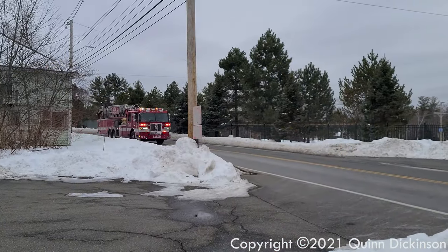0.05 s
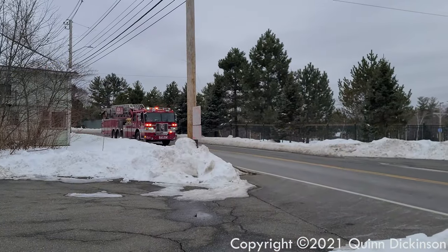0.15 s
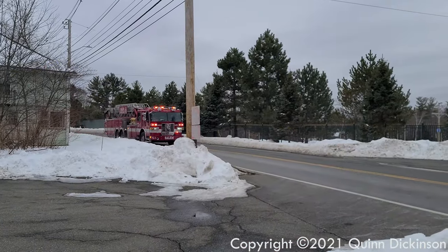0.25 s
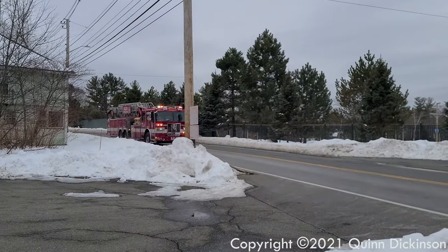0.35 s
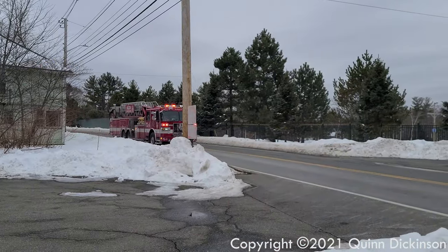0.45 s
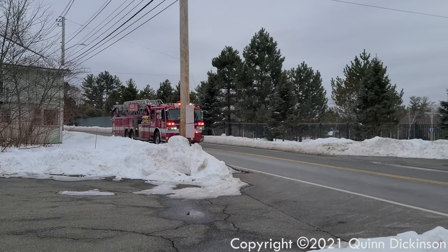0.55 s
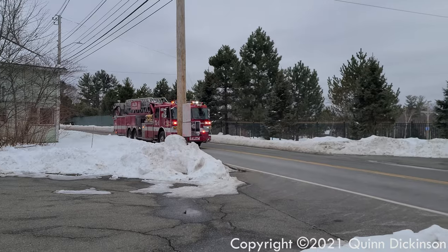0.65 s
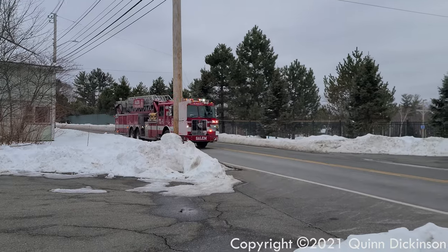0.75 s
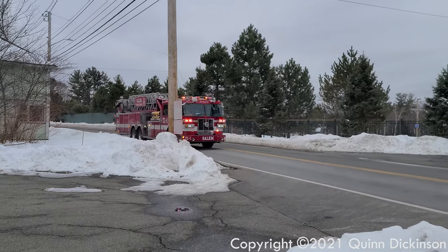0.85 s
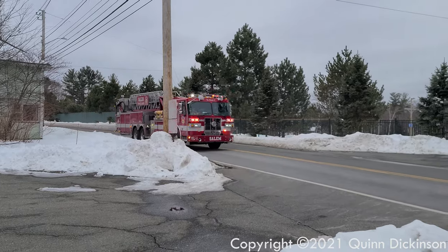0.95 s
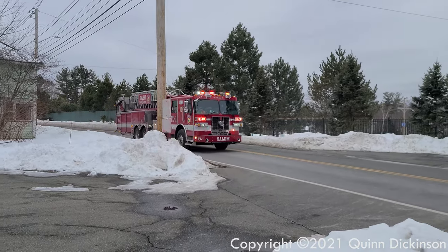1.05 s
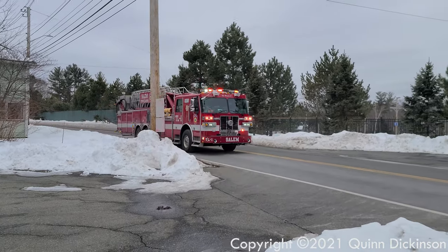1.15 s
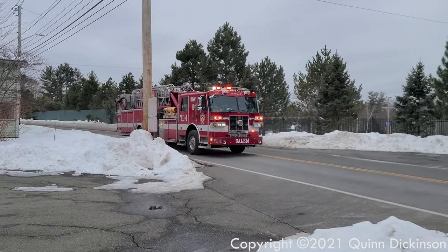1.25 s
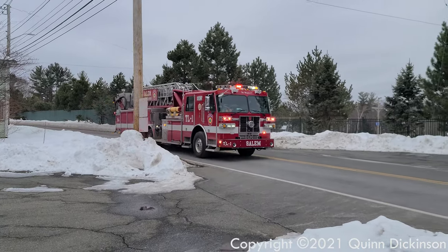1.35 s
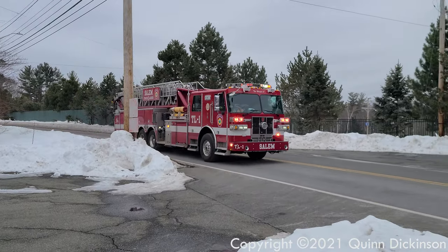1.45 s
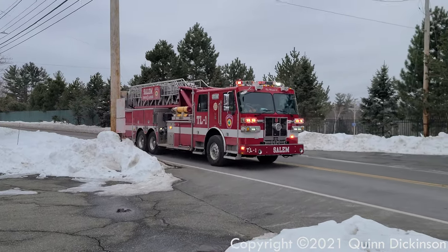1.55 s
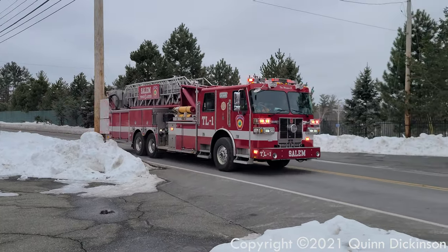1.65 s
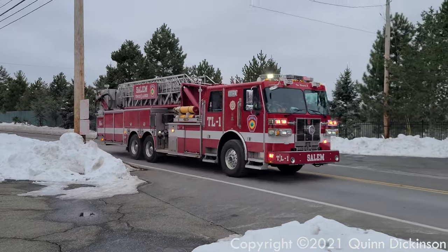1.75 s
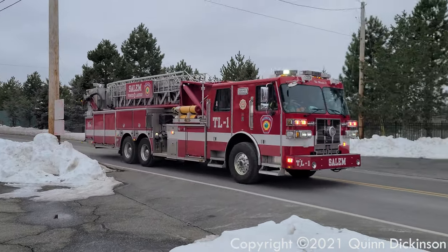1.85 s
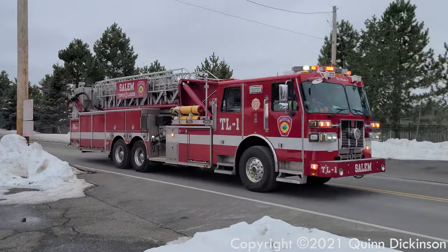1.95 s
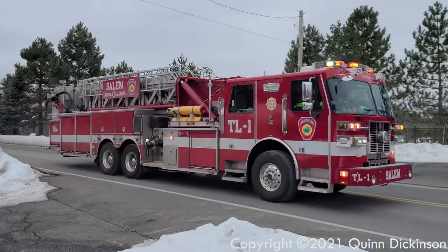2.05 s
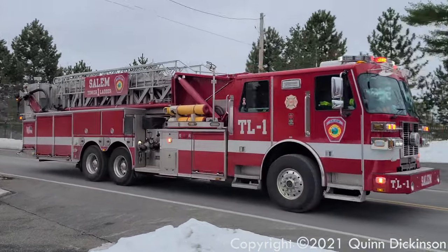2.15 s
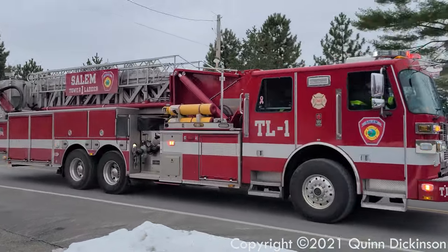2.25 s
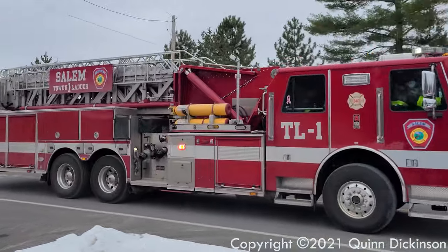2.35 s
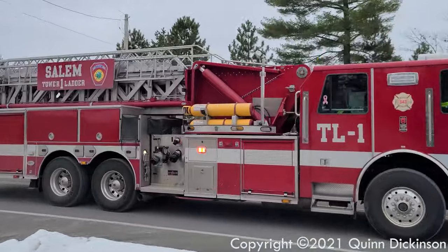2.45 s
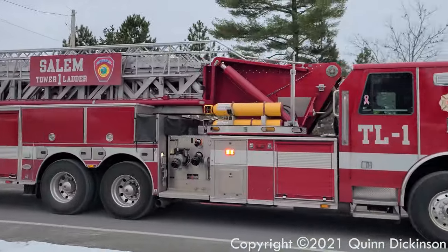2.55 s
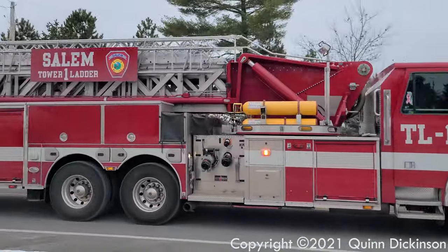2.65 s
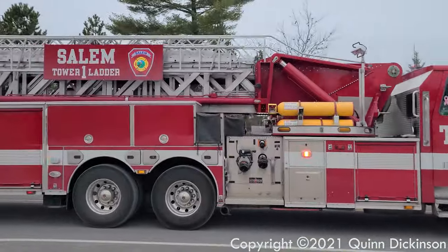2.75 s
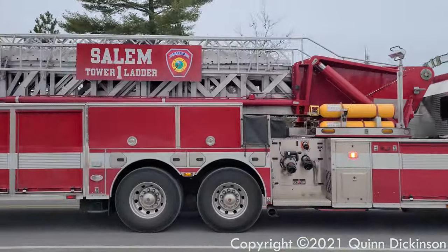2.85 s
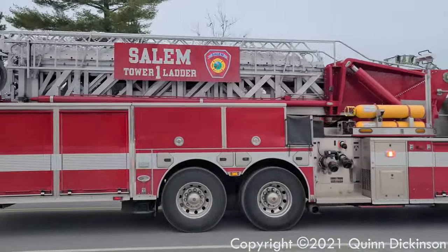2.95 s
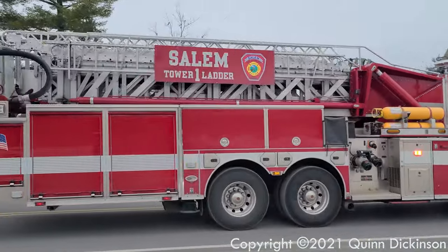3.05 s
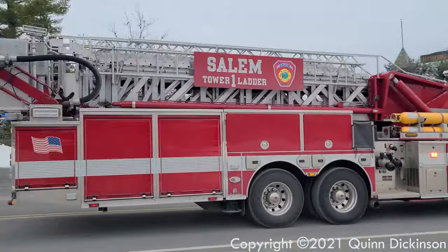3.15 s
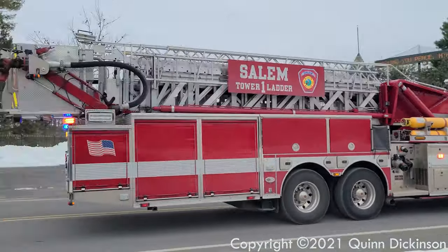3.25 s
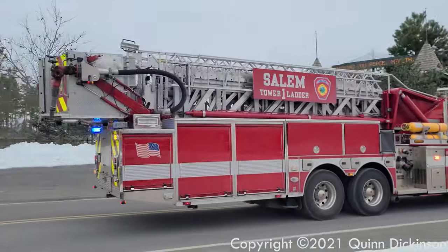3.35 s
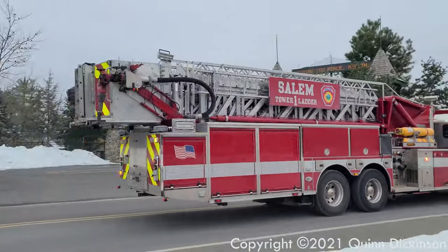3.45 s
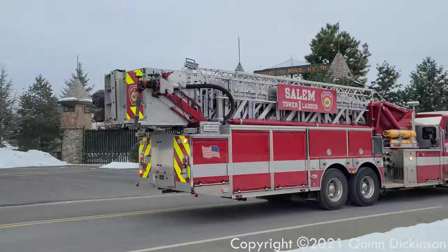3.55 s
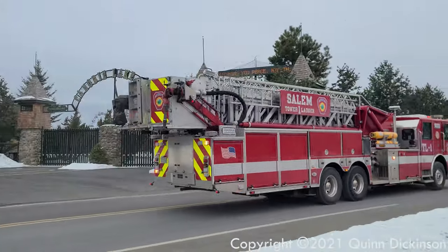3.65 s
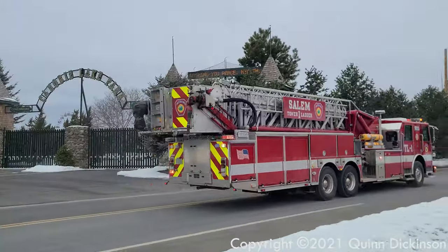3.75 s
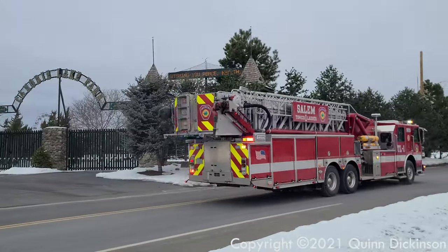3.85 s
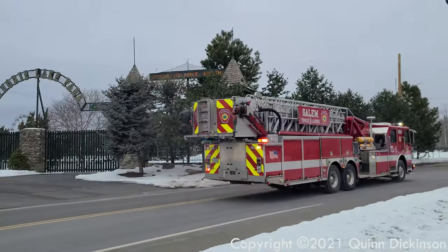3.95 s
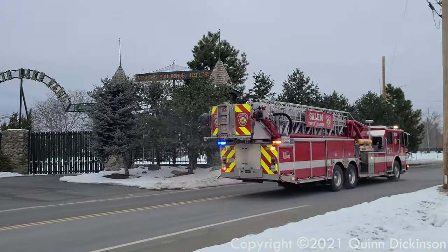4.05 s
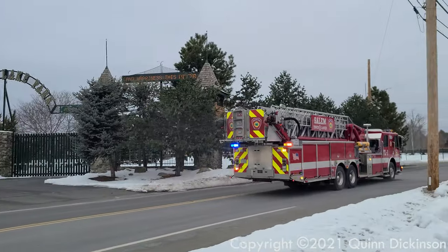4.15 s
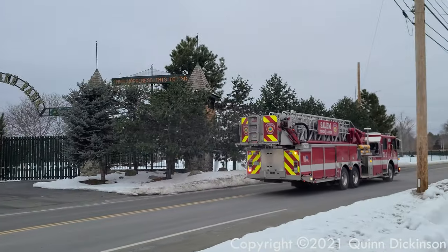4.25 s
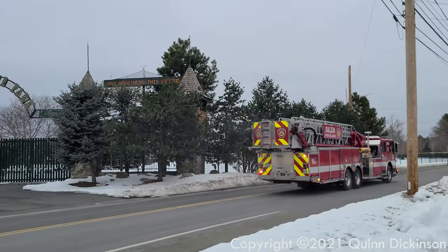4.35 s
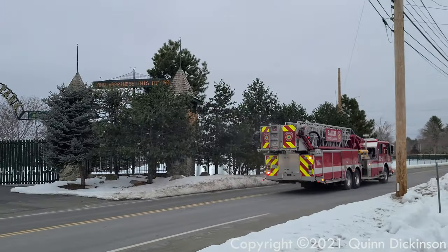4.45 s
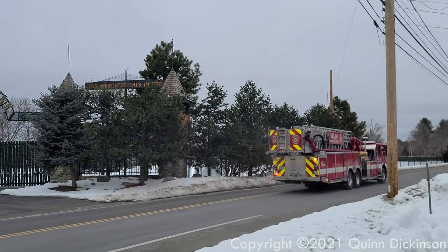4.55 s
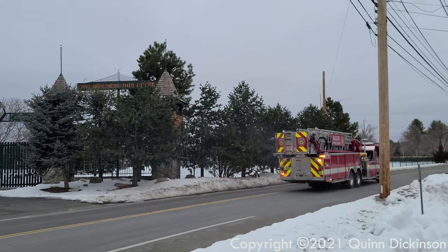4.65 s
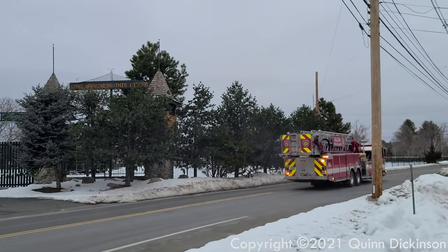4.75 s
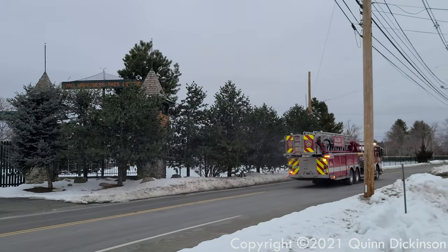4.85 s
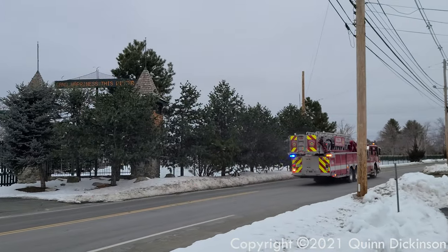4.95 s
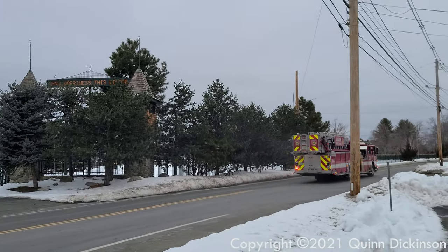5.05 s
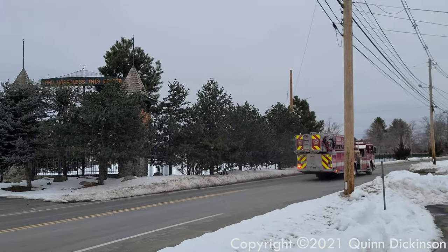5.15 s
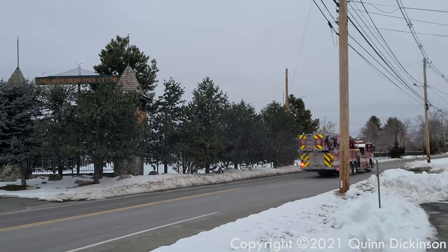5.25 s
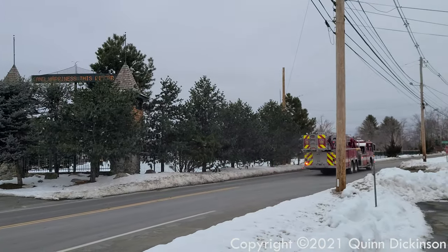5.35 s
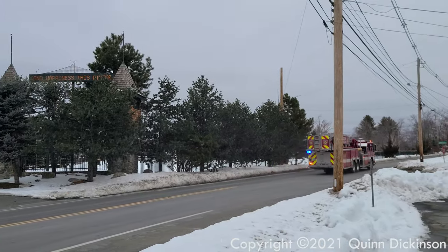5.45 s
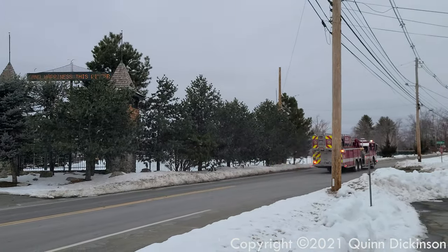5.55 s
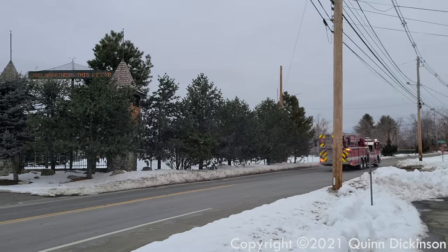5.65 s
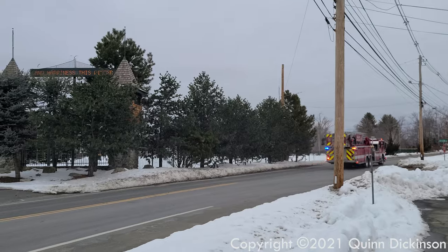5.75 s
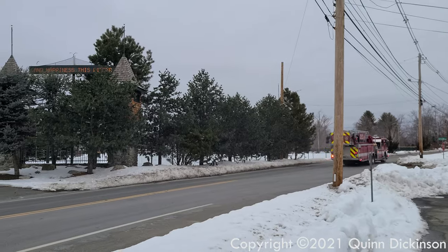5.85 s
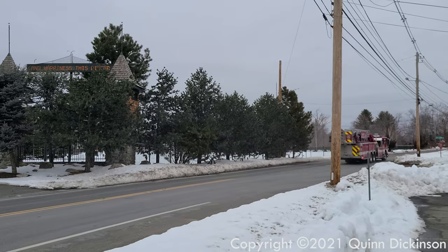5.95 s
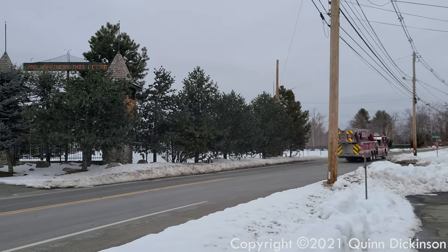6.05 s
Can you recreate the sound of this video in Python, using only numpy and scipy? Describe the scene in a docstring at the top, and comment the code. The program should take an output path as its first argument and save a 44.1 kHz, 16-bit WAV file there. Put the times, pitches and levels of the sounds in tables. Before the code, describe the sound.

A heavy diesel truck approaches on a road, tyres humming and roaring, swells past very close, then recedes into faint distant rumble.

```python
"""Diesel truck passing between snow banks

A heavy truck rolls past a hand-held camera that turns to follow it. Lugged tyres hum on three close pitches,
two from the front and one from the rear: sines on multiples of a rate, Doppler-bent and shaken.
Under them lie exhaust throb, gear whine and a low hum. Shaped noise gives rumble, boom, tyre roar and hiss;
narrow noise bands give the rising turbocharger whistle and a sinking hiss that rings in the microphone port.
Far traffic and faint ticks lie behind.
The two microphone ports hear it with different colours, the right one changing with the direction."""
import sys
import numpy as np
from scipy import signal
from scipy.io import wavfile
from scipy.ndimage import uniform_filter1d

SR = 44100
rng = np.random.default_rng(int(sys.argv[2]) if len(sys.argv) > 2 else 0)


def to_wav(sig):
    """Store sig (one row per channel, or 1-D mono) as 16-bit WAV at the path in sys.argv[1].

    Samples outside -1..1 are clipped; the rate is SR.
    """
    pcm = np.clip(np.atleast_2d(sig), -1, 1) * 32767
    pcm = np.round(pcm).astype(np.int16)
    wavfile.write(sys.argv[1], SR, pcm.T)  # frames by channels


def gain_from_db(level_db):
    """Convert decibel levels to linear amplitude factors (20 dB per decade)."""
    decades = np.asarray(level_db, float) / 20
    return 10 ** decades


N = 268965  # length in samples
FRAME, HOP = 2048, 512  # spectral frames in samples
SPEED_M_S, KERB_M, SOUND_M_S = 8.0, 3.214, 343  # road speed, nearest distance, speed of sound


# Tread tones. Each: pitch at rest in Hz, time abeam in seconds, then rows of partials.
# Each row: multiple of the pitch, level in dB before swell and gain, share of the passing swell,
# seconds ahead of that swell, gain abeam in dB.
FRONT_THRUM = 191.5, 2.4, [(1, -32, 1.24, 0.71, 0.6)]  # front tread lugs slapping the road
FRONT_LUGS = 193, 2.45, [(2, -42, 1.3, .3, .1), (3, -35, 1.13, 0.48, .1), (5, -45, 1.26, 0.16, .1)]
REAR_LUGS = 204, 3.1, [(1, -43.5, 0.93, 0.5, 14.5), (2, -52, 0.74, -0.37, 13), (3, -41, 1.18, 0.1, 3.4)]


def tyre_hum():
    """Tread lugs strike the road at a steady rate: three close pitches, two from the front, one from the rear."""
    thrum = hum(FRONT_THRUM, rough=0.3, wobble_s=0.034, far_share=0.6)
    front = hum(FRONT_LUGS, rough=0.42, wobble_s=0.013, far_share=0.4)
    rear = hum(REAR_LUGS, rough=0.4, wobble_s=0.012, far_share=0.44)
    return thrum + front + rear


# Exhaust tone: firings a second at rest, time abeam in seconds, then rows of partials.
# Each row: multiple, level in dB before swell and gain, share of the passing swell, seconds ahead, gain abeam in dB.
EXHAUST_FIRINGS = 64.3, 2.99, [(1, -41, .85, -.4, 11), (2, -52, 1.4, 0.16, 5.8)]


def exhaust_throb():
    """Regular firings make a low tone and its octave, steadier in pitch than the tyres."""
    return hum(EXHAUST_FIRINGS, rough=0.1, wobble_s=0.04, far_share=0.9, fade_db=1.2)


# Gear tones. Each: pitch at rest in Hz, time abeam in seconds, then rows of partials.
# Each row: multiple, level in dB before swell and gain, share of the passing swell, seconds ahead, gain abeam in dB.
DRIVE_LINE_GEAR = 533, 2.8, [(1, -45, 1.35, 0.41, .1)]
AXLE_GEAR_TONE = 1012, 2.75, [(1, -47, 0.92, -0.025, 8)]


def gear_whine():
    """Drive line and axle gears each whine on one pitch, the axle far rougher."""
    drive_line = hum(DRIVE_LINE_GEAR, rough=0.22, wobble_s=0.046)
    axle = hum(AXLE_GEAR_TONE, rough=0.85, wobble_s=0.014, far_share=0.25)
    return drive_line + axle


# Low hum: pitch at rest in Hz, time abeam in seconds, then rows of partials.
# Each row: multiple, level in dB before swell and gain, share of the passing swell, seconds ahead, gain abeam in dB.
LOW_HUM_TONE = 103, 2.6, [(1, -54, 0.59, .3, .1)]


def low_hum():
    """One soft partial below the tyre hum."""
    return hum(LOW_HUM_TONE, rough=0.33, wobble_s=0.03)


def hum(tone, rough, wobble_s, far_share=0.45, fade_db=0.8):
    """Sines on multiples of a rate, Doppler-bent, shaken in height and phase by uneven lugs or firings.
    Alongside, many wheels at unlike angles blur the pitch; from afar they merge into a cleaner line."""
    rest_hz, passes_s, partials = tone
    t, coarse_t = np.arange(N) / SR, np.arange(0, N + 256, 256) / SR
    speeding_up = 1 + 0.004 * (coarse_t - passes_s)  # share of pitch gained a second
    doppler = 1 - SPEED_M_S / SOUND_M_S * abeam(coarse_t, passes_s)[0]
    hz = rest_hz * speeding_up * doppler
    turns = np.cumsum(np.interp(t, coarse_t, hz)) / SR
    base_blur = rough * (far_share + (1 - far_share) * np.sqrt(nearness(t)))
    out = np.zeros(N)
    for multiple, *level in partials:
        multiple = round(multiple)
        db = level_db(coarse_t, passes_s, *level) + swells_db(multiple * hz, coarse_t)
        db += fade_db * wander(len(coarse_t), size=12)
        blur = base_blur * multiple ** 0.85  # higher multiples blur more
        a, b = wander((2, N), max(int(wobble_s * SR), 1))
        shake = (1 + blur * (a + 1j * b)) / np.sqrt(1 + 2 * blur ** 2)
        sine = np.sqrt(2) * (shake * np.exp(2j * np.pi * multiple * turns)).real
        out += gain_from_db(np.interp(t, coarse_t, db)) * sine
    return out


# Swells and dips, short or long, of the tyre, gear, exhaust and low hum tones.
# Each row: centre in seconds, pitch in Hz, swell (or dip, if negative) in dB, length in seconds.
TONE_SWELLS = [(0.296, 196, 9.5, 0.067), (0.734, 193, 3, .08), (0.924, 197.4, 9, 0.053),
               (1.168, 191, 2, 0.046), (1.478, 195, 8.5, 0.075), (1.72, 193, 7, .11), (1.948, 193, 4.5, .1),
               (2.49, 191, 11, 0.088), (2.826, 191, 10, 0.17), (1.818, 208, 9, .08), (2.322, 208, 9, .1),
               (2.96, 206, 12, .12), (3.28, 197, -7, .16), (2.22, 192, -6, .1), (4.053, 200, 7, 0.081),
               (.72, 395, 10, 0.085), (1.164, 397.6, 7, 0.22), (2.034, 391, 10.5, .1), (2.38, 389, 12, .07),
               (2.61, 386, 11, .07), (1.17, 402, 12, .07), (1.716, 413, 18, 0.057), (2.68, 414, 8, 0.12),
               (2.96, 402.5, 8, 0.18), (4.4, 400, 3.5, 0.36), (0.717, 583, 1.5, .07),
               (1.027, 600, 2, 0.084), (1.306, 580, 3.5, 0.15), (1.475, 589, 3.5, 0.076),
               (2.07, 593, 11, .1), (2.695, 569, 9.5, .08), (2.93, 569, 10, 0.12), (3.52, 567, 8.5, 0.073),
               (1.22, 620, 4.5, 0.064), (1.824, 623, 10.5, 0.17), (2.336, 624, 11.5, 0.2),
               (2.704, 623, 8.5, 0.1), (2.925, 616, 10, 0.078), (3.147, 615, 12, 0.1),
               (3.653, 602, 10, 0.18), (4.243, 601, 8.5, 0.11), (5.157, 603, 13, 0.26), (4.22, 63, -7, .08),
               (1.173, 972, 12, 0.082), (1.363, 980, 13, 0.094), (1.924, 988, 16, 0.067),
               (3.15, 950, 12, 0.099), (3.59, 925, 5, .08), (1.746, 1026, 9, 0.094),
               (2.113, 1030, 8.5, 0.25), (2.943, 1003, 10, 0.13), (3.452, 995, 8.5, .12),
               (5.697, 999, 11.5, 0.75), (1.322, 542, 7, 0.13), (1.658, 543, 9, 0.1),
               (2.07, 530, 10.5, 0.094), (2.46, 535, 5, 0.054), (2.72, 534, 9, 0.11), (2.98, 526, 8, 0.084),
               (3.35, 522, 13.5, 0.29), (2.3, 129, 15, 0.44), (2.3, 64.6, 3, 0.13), (3.5, 63.5, 1.5, 0.25),
               (.5, 105.4, 13, .36), (4.0, 62.4, 0, 0.059), (4.416, 63.5, 6, 0.063)]


def swells_db(partial_hz, t):
    """Swells and dips of any partial that lies near the listed pitch at the listed moment."""
    s, swell_hz, db, length_s = np.transpose(TONE_SWELLS)[:, :, None]
    in_time = ((t - s) / length_s) ** 2
    in_pitch = (np.log(partial_hz / swell_hz) / 0.022) ** 2  # reach as a share of pitch
    return (db * np.exp(-in_time - in_pitch)).sum(0)


# Spectra of exhaust rumble, body boom, tyre roar, engine bay hiss and fine fizz, in that order.
# Each row: frequency in Hz, relative density in dB per Hz.
NOISE_SPECTRA = [
    [(15, -12), (30, -4), (60, 0.5), (110, -6.5), (170, -1.5), (230, 1.5), (300, -68)],
    [(150, -30), (200, -22), (270, 2), (330, -3.5), (400, -6), (480, -26), (600, -40)],
    [(330, -22), (450, -5.5), (620, -3), (800, -1.5), (1000, -3.5), (1300, -3.5), (1700, -7), (2100, -11),
     (2800, -16.5), (4000, -21)],
    [(1500, -5.5), (2300, -2), (3200, -2), (4500, -5.5), (6000, -7.5), (7300, -2.5), (8200, -5.5),
     (8700, -13.5), (9200, -25)],
    [(8000, -19), (8900, -2), (9800, -2.5), (11500, -3.5), (13000, -6), (14500, -10), (15700, -14),
     (17000, -30)],
]
# The same five noises in the same order.
# Each row: time abeam in seconds, level in dB before swell and gain, share of the passing swell,
# seconds ahead of that swell, gain abeam in dB.
NOISE_PASSING = [(2.78, -39, 0.63, 0.11, 8.5), (2.78, -44, 0.83, -.1, 11.5),
                 (2.9, -25, 1.004, 0.0047, -0.03), (2.5, -34, 1.166, -0.0041, 4.5),
                 (2.9, -54, 1.18, 0.0085, 8.5)]


def truck_noise_power(hz, t):
    """Power of the five broad noises of the truck; its motion slides the spectra below 4 kHz."""
    bins = np.arange(len(hz))
    slide = np.outer(hz < 4000, 0.0088 * bearing_and_lag(t)[0])
    heard_bins = bins[:, None] * (1 + slide)
    power = np.zeros((len(hz), len(t)))
    for spectrum, level in zip(NOISE_SPECTRA, NOISE_PASSING):
        shape = spectrum_power(spectrum, hz)[0]
        power += np.interp(heard_bins, bins, shape) * gain_from_db(level_db(t, *level)) ** 2
    return power


# High band: port resonance at first, then the turbocharger whistle.
# Each row: time in seconds, centre in Hz, relative level in dB.
TURBO_WHISTLE = [(0, 10800, -90), (1.2, 11100, -74), (1.8, 11600, -56), (2.2, 12580, -57),
                 (2.6, 13120, -54), (3, 13900, -57), (3.5, 13800, -63), (4.0, 14000, -64),
                 (4.4, 14300, -80), (4.8, 14440, -84), (6.1, 14420, -90)]


def turbo_power(hz, t):
    """A fuzzy high band, broad from port resonance at first, then a narrower rising whistle."""
    coming = np.clip(-bearing_and_lag(t)[0], 0, 1)
    return band(TURBO_WHISTLE, hz, t, width_hz=260 + 240 * coming)


# Narrow hiss, ringing in the microphone port, sinking from about 8 to 7 kHz as the truck passes.
# Each row: time in seconds, centre in Hz, relative level in dB.
PORT_HISS = [(0, 8100, -66), (.95, 8100, -73), (1.05, 8300, -54.5), (1.3, 8160, -48.5), (1.6, 8100, -42),
             (2.2, 8000, -45), (2.7, 7600, -37.5), (3.2, 7300, -50), (4.0, 7150, -48), (4.6, 7252, -56.5),
             (5.3, 7250, -61), (6.1, 7250, -85)]


def port_hiss_power(hz, t):
    """A narrow band of hiss, ringing in the microphone port, that sinks in pitch as the truck passes."""
    return band(PORT_HISS, hz, t, width_hz=480)


# Far traffic. Each row: frequency in Hz, relative density in dB per Hz.
TOWN_SPECTRUM = [(10, -9), (35, -1), (60, -1), (100, -6), (160, -24), (300, -30), (600, -45)]


def town_power(hz):
    """Steady low rumble of far traffic."""
    return spectrum_power(TOWN_SPECTRUM, hz).T * gain_from_db(-48) ** 2


def noise_size(hz, t):
    """Magnitudes of all noises of truck and town, with drifting patches, narrow surges and treble gusts."""
    power = truck_noise_power(hz, t) + turbo_power(hz, t) + port_hiss_power(hz, t) + town_power(hz)
    patches = evened(uniform_filter1d(wander((len(t), len(hz)), size=20).T, size=3))
    # short narrow-band surges at random pitches
    surges = evened(uniform_filter1d(wander((len(t), len(hz)), size=3).T, size=9))
    gusts = np.outer(np.sqrt(hz / 8000), wander(len(t), size=2))
    flicker_db = 1.0 * patches + 1.5 * surges + 0.71 * gusts
    return np.sqrt(power) * gain_from_db(flicker_db + 0.5)  # half a dB of overall lift


# Faint high ticks near the right port. Each row: start in seconds, level in dB before each port's gain.
TICK_TIMES = [(5.5737, -64), (5.69, -64), (5.7932, -67), (5.99, -69), (6.0397, -67)]


def ticks(hz=13400, length_s=0.0036):
    """Short puffs of narrow treble noise, stronger at the right port."""
    t, out = np.arange(600) / SR, np.zeros(N)
    for s, db in TICK_TIMES:
        start = round(s * SR)
        a, b = wander((2, len(t)), size=24)
        narrow_noise = ((a + 1j * b) * np.exp(2j * np.pi * hz * t)).real
        puff = gain_from_db(db) * np.exp(-(t / length_s - 1.5) ** 2) * narrow_noise
        out[start:][:len(t)] += puff[:N - start]
    return out * gain_from_db([[-12], [3]])  # gain in dB at the left and right port


# How loud the truck arrives as it nears, clears the snow bank, passes and leaves.
# Each row: time in seconds, level of the passing swell in dB.
PASSING_SWELL = [(0, -19.5), (.5, -17.5), (.85, -15.5), (1.1, -10.5), (1.28, -7), (1.42, -2.16),
                 (1.75, -0.6), (2.08, 0.54), (2.3, -0.1), (2.7, -0.36), (2.95, -1.5), (3.5, -3.5),
                 (3.9, -7), (4.3, -11.5), (4.8, -15.5), (5.3, -17.5), (5.7, -19.5), (6.1, -18.5)]


def level_db(t, passes_s, db, share, ahead_s, abeam_db):
    """A part follows the passing swell by its own share and gains while it is alongside."""
    return db + share * follow(PASSING_SWELL, t + ahead_s)[0] + abeam_db * abeam(t, passes_s)[1]


def abeam(t, passes_s):
    """Sine and cosine of the angle to a part of the truck that is alongside at passes_s."""
    along_m = SPEED_M_S * (t - passes_s)
    range_m = np.hypot(along_m, KERB_M)
    return along_m / range_m, KERB_M / range_m


# Where the truck is seen from. Each row: time in seconds, bearing (-1 coming, 0 alongside, 1 leaving; no unit),
# delay of the left port behind the right in ms.
TRUCK_BEARING = [(0, -1.5, -0.12), (.8, -0.86, -0.092), (1.6, -0.78, -0.057), (2.1, -0.25, -0.0075),
                 (2.6, 0.35, 0.14), (3.1, 0.12, 0.2), (3.6, 0.75, 0.11), (4.4, 1.03, 0.062),
                 (6.1, 0.61, 0.14)]


def bearing_and_lag(t):
    """Bearing of the truck and lag of the left port in ms at each moment."""
    return follow(TRUCK_BEARING, t)


def nearness(t):
    """1 with the truck alongside, 0 when it is far up or down the road."""
    return 1 - np.clip(abs(bearing_and_lag(t)[0]), 0, 1)


# Colour of the right port over the left, before its cavity ring.
# Each row: frequency in Hz, then gain in dB coming, alongside and leaving.
RIGHT_COLOUR = [(60, 3.8, 4.3, 4.5), (500, 4.7, 5.2, 5.4), (1220, 10, 9, 8), (2010, 9, 11.5, 13),
                (2700, -1, 7, 8), (3800, 7, -2, -4), (4660, 11.5, 8, 8), (5880, 2, 7.5, 8.5),
                (6510, 4.5, 1.5, -.6), (8200, -4, -3.5, -3), (9350, 1.2, 7.5, 7.5), (11300, 14, 13, 10),
                (12800, 7, 10.5, 11), (15000, 11.4, 13, 11.7)]


def right_port(hz, t):
    """Colour of the camera body and arrival time at the right port, both turning with the bearing."""
    bearing, lag_ms = bearing_and_lag(t)
    coming, alongside, leaving = read(RIGHT_COLOUR, hz)[:, :, None]
    side = np.clip(bearing, -1, 1)
    colour_db = alongside + np.maximum(-side, 0) * (coming - alongside)
    colour_db += np.maximum(side, 0) * (leaving - alongside)
    ring_hz, ring_width_hz, ring_db = 7260, 270, 4.5  # cavity of the port
    colour_db += ring_db / (1 + ((hz[:, None] - ring_hz) / ring_width_hz) ** 2)
    return gain_from_db(colour_db) * np.exp(2j * np.pi * np.outer(hz, lag_ms * 1e-3))


# Agreement of the ports while the truck is far. Each row: frequency in Hz, left-right likeness from 0 to 1.
PORT_LIKENESS = [(50, 0.91), (300, 1), (700, 0.9), (1300, 0.8), (2200, 0.63), (3500, 0.39), (6000, 0.089),
                 (10000, 0.087)]


def likeness(hz, t, spread=1.05):
    """Alongside, the long truck fills a wide angle and the ports agree less."""
    return np.clip(read(PORT_LIKENESS, hz).T, 0, 1) ** (1 + spread * nearness(t))


# Echo off the chest of whoever holds the camera. Each row: time in seconds, left delay in ms,
# left share of the direct sound in the bass, right delay in ms, right share likewise.
CHEST_ECHO = [(0, 2.05, .2, 1.75, .15), (.5, 2.0, .3, 2.25, .15), (1.2, 2.0, .35, 2.25, .25),
              (1.8, 1.97, .35, 2.25, .2), (2.1, 1.8, .3, 2.22, .35), (2.7, 1.6, .15, 2.24, .4),
              (3.0, 1.6, .05, 2.3, .25), (3.15, 1.8, .05, 1.82, .2), (3.6, 1.93, .1, 1.85, .2),
              (3.8, 1.95, .45, 1.95, .45), (4.5, 2.0, .35, 2.0, .3), (5.1, 2.02, .25, 2.0, .2),
              (6.1, 2.05, .25, 2.02, .3)]


def echo(hz, t, soft_hz=3500):
    """The comb of one close reflection a port; cloth swallows its treble."""
    left_ms, left, right_ms, right = follow(CHEST_ECHO, t)
    share = np.array([left, right])[:, None] / (1 + (hz[:, None] / soft_hz) ** 2)
    delay_ms = np.array([left_ms, right_ms])[:, None]
    return 1 + share * np.exp(-2j * np.pi * hz[:, None] * delay_ms * 1e-3)


def band(rows, hz, t, width_hz):
    """Power of a fuzzy band that follows a curve of pitch and level."""
    centre_hz, db = follow(rows, t)
    bump = np.exp(-0.5 * ((hz[:, None] - centre_hz) / width_hz) ** 2)
    return bump / bump.sum(0) * gain_from_db(db) ** 2


def spectrum_power(points, hz):
    """Power spectrum through the points, falling away to the top, scaled to sum 1."""
    power = gain_from_db(read(points + [(SR / 2, -90)], hz)) ** 2
    return power / power.sum()


def read(points, hz):
    """Spectrum rows joined on a log-frequency axis."""
    f, *values = np.transpose(points)
    return np.array([np.interp(np.log(hz + 1), np.log(f + 1), v) for v in values])


def follow(rows, t):
    """Curve rows joined in time."""
    s, *columns = np.transpose(rows)
    return np.array([np.interp(t, s, c) for c in columns])


def wander(shape, size):
    """Smooth chance of rms 1, averaged twice along the last axis."""
    return evened(uniform_filter1d(uniform_filter1d(rng.standard_normal(shape), size), size))


def evened(x):
    """Scales to rms 1."""
    return x / np.sqrt(np.mean(abs(x) ** 2) + 1e-20)


def scene():
    """Tones reach both ports alike before port colour and echo; the noises agree only in part."""
    tones = tyre_hum() + exhaust_throb() + gear_whine() + low_hum()
    hz, t, lines = signal.stft(tones, SR, nperseg=FRAME, noverlap=FRAME - HOP)
    a, b, c, d = rng.standard_normal((len(t), len(hz), 4)).T
    shared, own = a + 1j * b, c + 1j * d
    same, size = likeness(hz, t), noise_size(hz, t)
    left = lines + size * shared
    right = lines + size * (same * shared + np.sqrt(1 - same ** 2) * own)
    spectra = echo(hz, t) * [left, right * right_port(hz, t)]
    ports = signal.istft(spectra, SR, nperseg=FRAME, noverlap=FRAME - HOP)[1]
    return ports[:, :N] + ticks()


def top_cut(x):
    """Nothing passes above the cut-off."""
    return signal.sosfilt(signal.butter(12, 15780, fs=SR, output="sos"), x)


def record(dry):
    """The microphones drop the deepest bass."""
    low_cut = signal.butter(N=2, Wn=38, btype="high", fs=SR, output="sos")
    mix = signal.sosfilt(low_cut, dry)
    return top_cut(mix)


dry = scene()
out = record(dry)
to_wav(out)
```